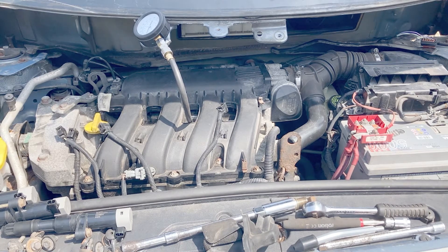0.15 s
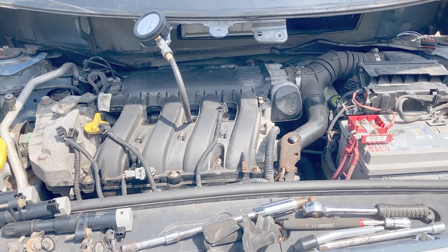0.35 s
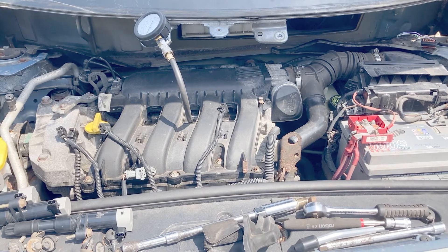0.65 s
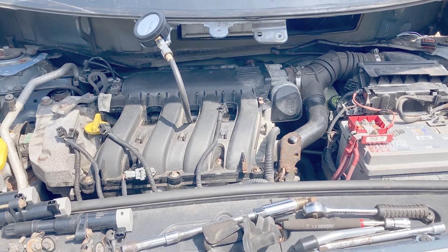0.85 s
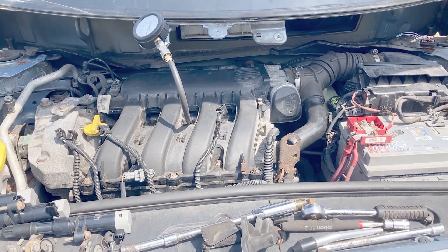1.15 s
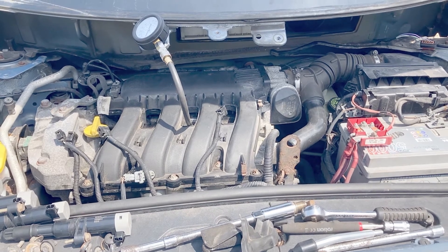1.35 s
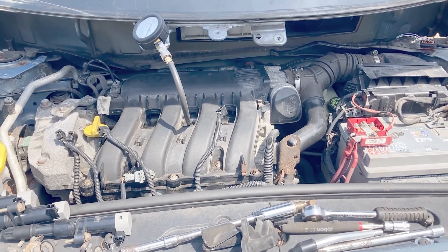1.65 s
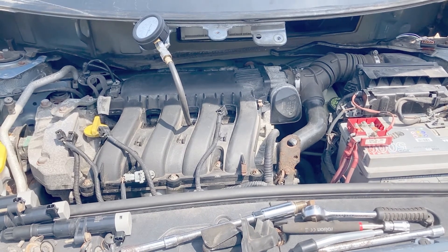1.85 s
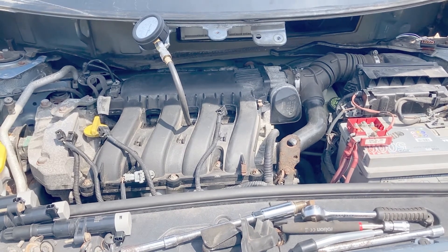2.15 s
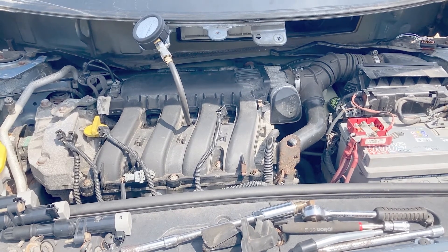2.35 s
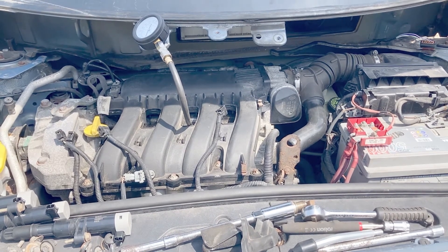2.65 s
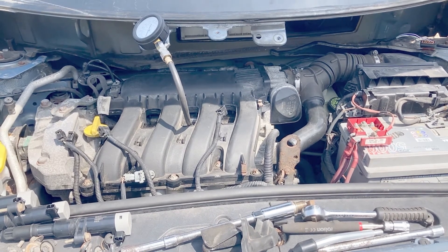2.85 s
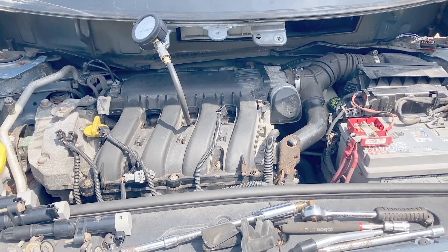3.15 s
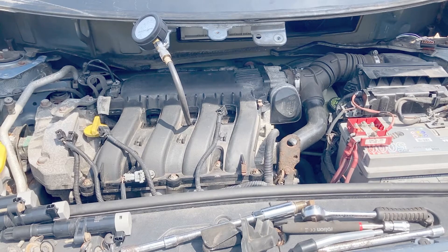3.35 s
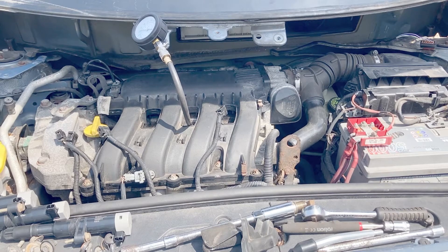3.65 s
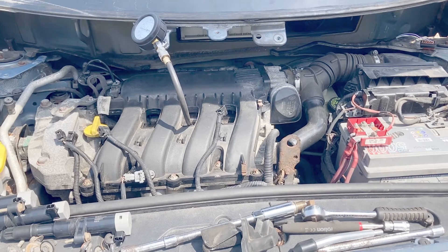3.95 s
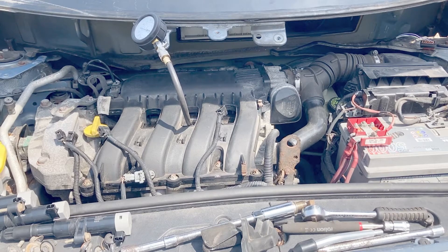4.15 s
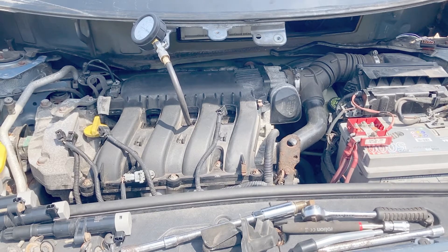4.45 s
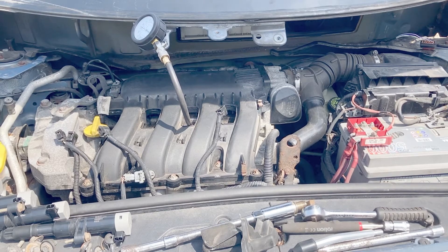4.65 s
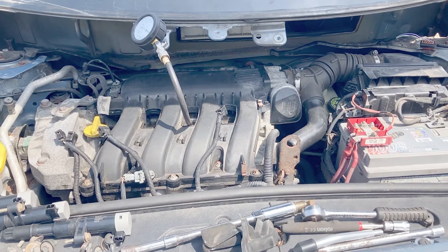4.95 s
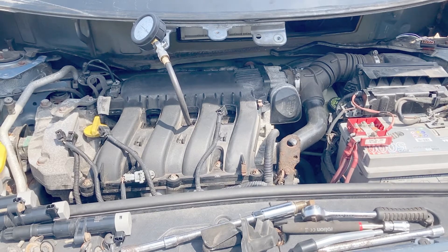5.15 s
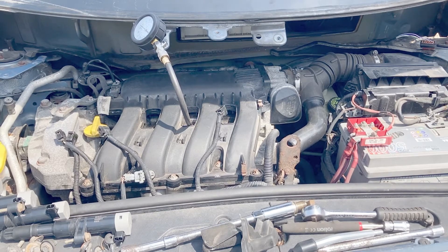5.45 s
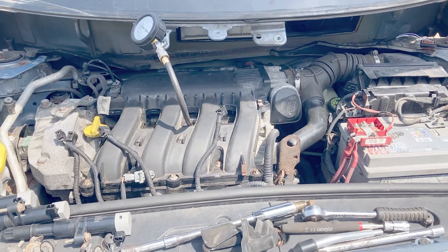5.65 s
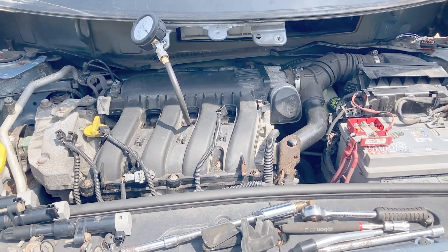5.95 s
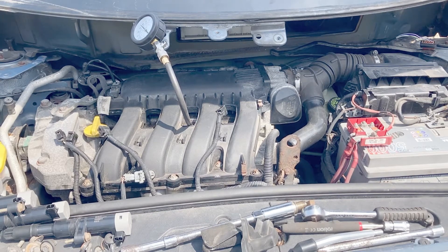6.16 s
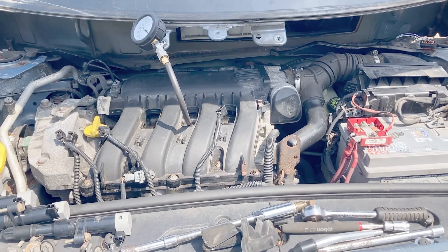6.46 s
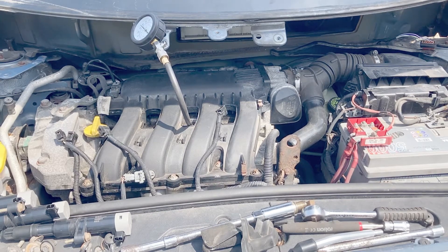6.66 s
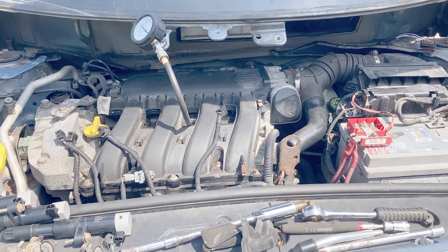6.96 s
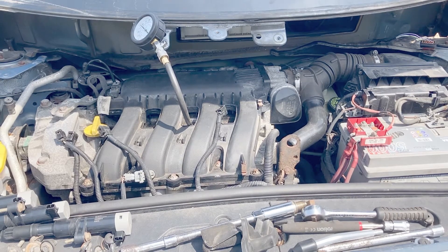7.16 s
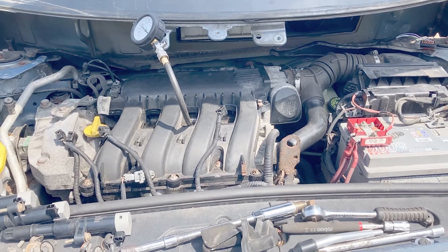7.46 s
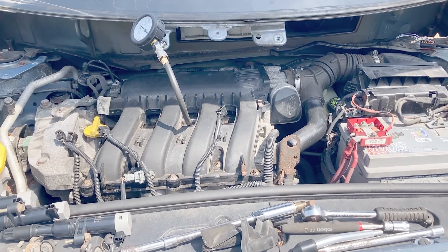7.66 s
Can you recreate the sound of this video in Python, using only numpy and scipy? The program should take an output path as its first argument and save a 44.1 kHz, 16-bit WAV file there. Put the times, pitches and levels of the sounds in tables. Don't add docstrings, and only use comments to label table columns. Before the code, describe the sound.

Outdoors, close over an open engine bay, stereo phone microphones. From 0 to 1.6 s it is quiet: low wind buffets, distant traffic, slight rustling, very faint bird warbles, a dull click near 0.75 and tiny ones at 1.43. At 1.58 to 1.68 clicks tumble into a loud metallic slam. The starter moans and grinds through a slow heave, then a second from 2.0 that drops in pitch. At 2.48 one hard, hollow knock; the level ducks briefly and recovers. Until 6.3 the engine cranks without catching: a gritty toothed growl on each compression, sagging slightly, followed by looser rattle, roughly every 0.17 s, with uneven clanks and ringing. At 6.3 it releases with a thud, rocking back with small knocks. A bright brush hiss and soft whirr fade until about 7.5, with a faint falling squeak near 7.1. Light clicks come at 6.8, 7.3, 7.7 and 7.8 over wind.

```python
import sys
import numpy as np
from scipy import signal
from scipy.fft import rfft, irfft, next_fast_len
from scipy.io import wavfile
from scipy.ndimage import uniform_filter1d

SR = 44100
rng = np.random.default_rng(int(sys.argv[2]) if len(sys.argv) > 2 else 0)


def amplitude_ratio(level_db):
    exponent = np.asarray(level_db, float) / 20
    return 10 ** exponent


def file_out(sig):
    cols = np.atleast_2d(sig).T
    lim = np.clip(cols, -1, 1)
    pcm = np.round(lim * 32767).astype(np.int16)
    wavfile.write(sys.argv[1], SR, pcm)


N = 343980
T = np.arange(N) / SR
F = np.fft.rfftfreq(4096, 1 / SR)
BURST = 6000


def curve(rows, off_db=None):
    s, *columns = np.transpose(rows)
    return [np.interp(T, s, c, off_db, off_db) for c in columns]


def colour(x, slope, modes=()):
    hz, db = np.transpose(slope)
    power = amplitude_ratio(np.interp(np.log(F + 1), np.log(hz), db)) ** 2
    power = power * (1 + sum(amplitude_ratio(g) ** 2 / (1 + (2 * (F - f) / w) ** 2) for f, w, g in modes))
    cepstrum = irfft(np.log(power / power.mean()) / 2)
    cepstrum[1:2048] *= 2
    cepstrum[2049:] = 0
    response = irfft(np.exp(rfft(cepstrum)))[:2048]
    return signal.fftconvolve(x, response)[:len(x)]


def walk(rate):
    k = int(SR / rate)
    held = np.repeat(rng.standard_normal(N // 20), k)[:N]
    return uniform_filter1d(uniform_filter1d(held, k), k)


def noise():
    return rng.standard_normal(N)


def tone(hz):
    return np.sin(2 * np.pi * np.cumsum(hz) / SR)


def add(out, s, sound):
    i = int(s * SR)
    out[i:i + len(sound)] += sound[:len(out) - i]


def ring(hz, t60):
    t = np.arange(BURST) / SR
    return np.sin(2 * np.pi * hz * t) * amplitude_ratio(-60 * t / t60)


def swell(samples):
    return np.minimum(np.arange(BURST) / samples, 1)


def castings(count):
    place, strength = rng.random((count, 2)).T
    centres_hz = 1500 + 12000 * place ** 1.5
    return [(hz, 30 + hz / 220, db) for hz, db in zip(centres_hz, 5 + 9 * strength)]


# (time [s], grind peak [dB], take-up clank [dB])
STROKES = [(1.9858, -19.5, -18), (2.2434, -19, -22), (2.425, -18.5, -22), (2.576, -19, -15),
           (2.7717, -15.5, 0), (2.9514, -17.5, -0.5), (3.1242, -17.5, -26), (3.276, -19, -3),
           (3.46, -17.5, -6.5), (3.637, -18.5, -1), (3.8126, -18, -6.5), (3.9625, -19, -3),
           (4.1443, -18, -3.5), (4.323, -18.5, -0.5), (4.4955, -17.5, -3), (4.6471, -19.5, -16),
           (4.8309, -19, -1.5), (5.0065, -18.5, -4.5), (5.1757, -17.5, -2), (5.327, -19.5, -6.5),
           (5.509, -17, -4), (5.6872, -19, -1.5), (5.857, -17.5, -1.5), (6.0061, -19.5, -10),
           (6.1869, -17, -6)]
# (tooth [dB], overrun below load [dB], loaded time [s], backlash thud [dB])
CYLINDERS = [(2.5, -6, 0.091, -26), (1, -6, 0.087, -35), (-7.5, -6.5, 0.075, -30.5),
             (-1.5, -5.5, 0.106, -45)]
# (time [s], tooth rate [Hz], grind [dB], motor moan [dB])
SPIN_UP = [(1.66, 125.1, -27, -51), (1.73, 148.6, -37, -26), (1.775, 192.7, -29.5, -35),
           (1.84, 201, -29, -27.5), (1.91, 191.7, -29.5, -26.5), (1.93, 191.7, -33, -37.5),
           (1.98, 184, -36, -40)]
# (time [s], tooth rate [Hz], motor moan [dB])
SECOND_HEAVE = [(1.995, 329.3, -40), (2.045, 329.3, -29), (2.09, 278.4, -27.5), (2.14, 227, -25),
                (2.165, 242.7, -38), (2.215, 246.2, -32), (2.235, 242.2, -70)]
LONG_STROKE_S = 0.151
TAKE_UP_HZ, SLOWING_HZ_PER_S = 386.5, 600
KNOCK_S, KEY_OFF_S = 2.476, 6.295
KICK_BACK_DB = 7


def crank():
    first_hz, grind_db, _ = curve(SPIN_UP)
    hz = np.where(T < STROKES[0][0], first_hz, curve(SECOND_HEAVE)[0])
    grind = (T > SPIN_UP[0][0]) * amplitude_ratio(grind_db)
    tooth, clank, rattle = np.zeros((3, N))
    ends = [row[0] for row in STROKES[1:]] + [KEY_OFF_S + 0.092]
    for k, (s, peak_db, clank_db) in enumerate(STROKES):
        tooth_db, overrun_db, loaded_s, _ = CYLINDERS[k % len(CYLINDERS)]
        if k == 0:
            loaded_s = LONG_STROKE_S
        if s < KNOCK_S < ends[k]:
            loaded_s = KNOCK_S + 0.0078 - s
        if k == len(STROKES) - 1:
            overrun_db += KICK_BACK_DB
        span = slice(int(s * SR), int(ends[k] * SR))
        t = T[span] - s
        load = 1 / (1 + np.exp((t - loaded_s) / 0.0051))
        if k > 0:
            start_hz = TAKE_UP_HZ * (1 + .025 * rng.standard_normal())
            hz[span] = start_hz - SLOWING_HZ_PER_S * np.minimum(t, loaded_s)
        snap = .75 - .5 * (0 < s - KNOCK_S < .15)
        bite = snap * np.minimum(t / .0025, 1) + (1 - snap) * np.minimum(t / .03, 1)
        bite_db = -10.5 - 9 * (t / loaded_s - .64) ** 2 / 0.24
        letting_go = 1 + np.exp((t - loaded_s + 0.0034) / 0.0018)
        tooth[span] = amplitude_ratio(peak_db + tooth_db + bite_db) * load / letting_go
        grind[span] = amplitude_ratio(peak_db - 4.5 - 6.5 * t) * load * bite
        clank[span] = amplitude_ratio(peak_db + clank_db) * np.minimum(t / 0.003, 1) * np.exp(-t / 0.018)
        parting = np.clip((ends[k] - s - t) / 0.013, .6, 1)
        racing_db = -1.5 - 60 * np.abs(t - loaded_s - .018)
        rattle[span] = amplitude_ratio(peak_db + overrun_db + racing_db) * (1 - load) * parting
    on = 1 / (1 + np.exp(np.clip((T - KEY_OFF_S) / .014, -30, 30)))
    return hz, tooth * on, grind * on, clank * on, rattle * on


# (frequency [Hz], width [Hz], level over the slope [dB])
BODY = [(360.4, 36.5, 16.5), (474, 63, 15.5), (583, 25, 16), (914, 55, 17.5), (1003, 45, 17.5),
        (1108, 41, 18.5), (1316, 67, 16.5), (1500, 14, 16), (2245, 27, 14), (2365, 36, 11.5),
        (2624, 25, 15), (3420, 38, 15), (3650, 13, 6.5), (5500, 100, 12.5), (6800, 130, 11),
        (7430, 180, 7.5)]
# (frequency [Hz], density [dB per Hz])
TOOTH = [(60, -34.5), (200, -15), (340, -9.5), (500, -3.5), (680, -0.5), (1000, -14.5), (1400, -6.5),
         (2500, -22), (16000, -85)]
GRIND = [(60, -9), (150, -0.5), (400, -2), (1000, -4), (2000, -6.5), (3500, -9.5), (4900, -11.5),
         (5600, -10.5), (7000, -11.5), (7900, -6.5), (9150, -4), (10200, -9), (11000, -15), (15500, -11),
         (20000, -38.5)]
CLANK = [(100, -31.5), (300, 6), (480, -8.5), (650, -5.5), (900, -3.5), (1500, -27), (3000, -17),
         (7000, -12.5), (16000, -11)]
RATTLE = [(60, -2.5), (150, 3.5), (330, -4.5), (500, -3.5), (1000, -7), (2000, -8.5), (3500, -10),
          (4900, -11.5), (5600, -6), (7000, -9.5), (7900, -4), (9150, -4), (10200, -5), (11000, -12.5),
          (15500, -3.5), (20000, -43)]
# (frequency [Hz], level [dB])
MOAN = [(130, -18), (200, -3), (235, -17), (320, -6), (400, 0), (560, -3.5), (650, -7), (800, -27.5),
        (1000, -5), (1350, -7), (2000, -27)]
OVERTONE_DB = -1.5
OVERRUN_HZ, OVERRUN_DB = 490, -12


def starter():
    hz, tooth, grind, clank, rattle = crank()
    phase = np.cumsum(hz * (1 + 0.02017 * walk(100)) / SR)
    hits = np.flatnonzero(np.diff(np.floor(phase)))
    early = (0.025 * noise()[:len(hits)] * SR / hz[hits]).astype(int)
    strength = amplitude_ratio(3.45 * noise()[:len(hits)]) * np.sqrt(SR / hz[hits])
    pulses = np.zeros(N)
    pulses[np.clip(hits - early, 0, N - 1)] = strength
    gate = 0.64 + 0.55 * np.exp(-(phase % 1) / 1.07)
    scrape = noise() * gate * amplitude_ratio(2.86 * walk(75) + 1.1 * walk(350))
    chatter = noise() * amplitude_ratio(0.94 * walk(220))
    steady_grind = noise() * grind * amplitude_ratio(-4.5 + 2.0 * walk(9))
    layers = [(pulses * tooth, TOOTH), (scrape * grind, GRIND), (noise() * clank, CLANK),
              (chatter * rattle, RATTLE), (steady_grind, GRIND)]
    out = sum(colour(x, slope, BODY + castings(count=80)) for x, slope in layers)
    whine = tone(OVERRUN_HZ * (1 + 0.01927 * walk(30)))
    out += rattle * amplitude_ratio(OVERRUN_DB + 8.9 * walk(40)) * whine
    moan = amplitude_ratio(curve(SPIN_UP, -120)[-1]) + amplitude_ratio(curve(SECOND_HEAVE, -120)[-1])
    case_hz, case_level_db = np.transpose(MOAN)
    turns = np.cumsum(hz) / SR
    for k in range(1, 8):
        case_db = np.interp(np.log(k * hz), np.log(case_hz), case_level_db)
        level = amplitude_ratio(case_db + k * OVERTONE_DB + 1.7 * walk(50))
        out += np.sqrt(2) * moan * level * np.sin(2 * np.pi * k * (turns + 0.094 * walk(60)))
    return out


# (time [s], peak [dB], frequency [Hz], half length [s]) # tooth rate sliding through the block
GROWLS = [(2.296, -34, 336, 0.019), (2.473, -24.5, 355, 0.02), (2.655, -24, 334, 0.032),
          (2.823, -21.5, 347, 0.038), (3.011, -22.5, 345, 0.014), (3.179, -20, 353, 0.022),
          (3.344, -22.5, 347, 0.02), (3.522, -18.5, 361, 0.024), (3.715, -26, 345.7, 0.011),
          (3.863, -20.5, 359.5, 0.02), (4.033, -22, 343.7, 0.012), (4.2, -19.5, 353, 0.027),
          (4.365, -30, 353, 0.03), (4.551, -21, 358.3, 0.029), (4.718, -25, 345, 0.021),
          (4.895, -17.5, 350, 0.013), (5.065, -24.5, 346, 0.011), (5.237, -17.5, 363, 0.011),
          (5.406, -23, 335, 0.02), (5.566, -18.5, 352, 0.027), (5.73, -25, 352, 0.016),
          (5.905, -22, 361.8, 0.029), (6.081, -22.5, 339, 0.012), (6.254, -18.5, 347, 0.014)]
SURGES = [(2.315, -20, 947, 0.013), (2.438, -15, 950, 0.0043), (2.659, -21.5, 959, 0.017),
          (2.839, -18, 960, 0.0056), (3.004, -21.5, 1017, 0.016), (3.162, -31.5, 1106, 0.027),
          (3.348, -17, 988, 0.0063), (3.526, -23, 960, 0.0075), (3.701, -19.5, 980, 0.0073),
          (3.866, -39, 1050, 0.0041), (4.013, -21, 1083, 0.016), (4.204, -26.5, 1030, 0.03),
          (4.342, -19, 962, 0.0093), (4.527, -28.5, 965, 0.031), (4.703, -29, 1077, 0.0058),
          (4.891, -28, 975, 0.018), (5.072, -34, 1000, 0.006), (5.228, -37.5, 1044, 0.016),
          (5.386, -29, 997, 0.025), (5.523, -30, 960, 0.01), (5.749, -22, 988, 0.0077),
          (5.909, -36, 1048, 0.0049), (6.083, -19, 1022, 0.0087), (6.258, -23, 991, 0.0075)]
HEAVE_SURGES = [(1.668, -23, 575, 0.018), (2.3, -23, 915, 0.01302), (2.068, -20.5, 840, 0.018),
                (2.02, -30, 820, 0.02), (2.11, -28.5, 820, 0.013), (2.03, -31, 325, 0.036),
                (6.446, -35.5, 1300, .005), (6.495, -39, 1310, 0.0033), (6.534, -37, 1240, 0.0043),
                (6.603, -34, 1010, .005), (6.373, -29, 990, 0.0067)]
HUMS = [(2.276, -20, 441.4, 0.0088), (2.453, -28.5, 458, 0.013), (2.597, -55, 484, 0.009),
        (2.786, -22, 488, 0.0095), (2.975, -34.5, 444, 0.024), (3.171, -31, 469.3, 0.01),
        (3.332, -32, 467.6, 0.011), (3.492, -27, 465.6, 0.025), (3.694, -31, 438, 0.018),
        (3.837, -21, 480, 0.01), (3.994, -30.5, 478, 0.06), (4.165, -24, 460.7, 0.014),
        (4.446, -25.5, 490, 0.0091), (4.552, -22.5, 478, 0.013), (4.723, -29, 450, 0.017),
        (4.854, -22.5, 474, 0.012), (5.038, -37, 470, 0.03), (5.216, -31, 476, 0.043),
        (5.341, -21, 460, 0.0081), (5.543, -25.5, 485.5, 0.037), (5.761, -23.5, 465, 0.0086),
        (5.885, -28, 469, 0.016), (6.069, -24, 454, 0.011), (6.221, -20, 483, 0.025)]


def growls():
    out = np.zeros(N)
    # (swells, trim [dB], sag [Hz per s])
    groups = ((GROWLS, -1.5, 300), (SURGES + HEAVE_SURGES, -4.0, 100), (HUMS, -3.0, 50))
    for rows, trim_db, sag_hz_per_s in groups:
        for s, db, hz, half_s in rows:
            t = np.arange(-3 * half_s, 3 * half_s, 1 / SR)
            rough = walk(160)[:len(t)]
            voice = np.sin(2 * np.pi * ((hz - sag_hz_per_s * t / 2) * t + 0.031 * rough))
            level = amplitude_ratio(db + trim_db + 2.8 * walk(112.7)[:len(t)])
            add(out, s + t[0], level * .5 ** ((t / half_s) ** 2) * voice)
    return out


def releases():
    out = np.zeros(N)
    for k, (s, peak_db, clank_db) in enumerate(STROKES[1:], 1):
        loaded_s, scatter = CYLINDERS[k % len(CYLINDERS)][2], rng.standard_normal()
        add(out, s + 0.00857, amplitude_ratio(peak_db + clank_db - 5.0) * ring(478.5, 0.1) * swell(400))
        gentle_db = -8.3 * (0 < s - KNOCK_S < .15)
        jingle = ring(7300 + 300 * scatter, 0.24) * (0.26 + 2 * walk(1400)[:BURST])
        add(out, s, amplitude_ratio(peak_db - 14.5 + gentle_db) * jingle)
        release_db = peak_db - 12.5 + np.clip(scatter, -1, 1) * np.pi
        add(out, s + loaded_s - .018, amplitude_ratio(release_db) * ring(672.1, 0.16) * swell(400))
    return out


# (time [s], peak [dB])
THUDS = [
    (1.657, -29.5),
    (2.212, -37),
    (6.267, -21.5),
    (6.304, -24),
    (6.377, -30),
    (6.42, -37),
]
# (frequency [Hz], level [dB], t60 [s])
KNOCK = [(688, -5.5, 0.081), (1900, -30, 0.17), (900, -5, 0.025), (1250, -19.5, 0.044), (1644, -5.5, 0.017),
         (2020, -10.5, 0.02), (3000, -15.5, 0.017)]
KNOCK_DB = -3.5
THUD_LAG_S = 0.0085


def thuds():
    out = np.zeros(N)
    take_ups = [(row[0] + THUD_LAG_S, CYLINDERS[k % len(CYLINDERS)][-1]) for k, row in enumerate(STROKES)]
    for s, peak_db in THUDS + take_ups:
        add(out, s, amplitude_ratio(peak_db + 4.0) * ring(139.6, 0.11) * swell(350))
    knock = sum(amplitude_ratio(db) * ring(hz, t60) for hz, db, t60 in KNOCK)
    add(out, KNOCK_S, amplitude_ratio(KNOCK_DB) * knock * swell(60))
    return out


# (time [s], peak [dB], treble tilt [about dB per octave, -4 is
# flat], t60 [s], ring [Hz])
CLICKS = [(0.733, -41.5, -11, 0.18, 1300), (0.762, -35, -14.5, 0.15, 750), (1.434, -42, 2, 0.039, 10300),
          (1.44, -49, 3, 0.033, 4000), (1.577, -37, -5, 0.038, 11500), (1.579, -25.5, -5.5, 0.056, 980),
          (1.594, -43, 6, 0.019, 11700), (1.602, -25, -6, 0.023, 7840), (1.604, -25, -8, 0.046, 960),
          (1.616, -42, -7, 0.1, 990), (1.635, -44, -5, .05, 11500), (1.644, -30, -8, 0.13, 6930),
          (1.647, -19.5, 3.5, 0.046, 7500), (1.654, -9, -3, 0.056, 583), (1.671, -10.5, -7, 0.018, 506),
          (1.675, -20, -9, 0.1, 458), (2.438, -16, -1.5, 0.02, 946), (2.472, -9.5, -6, 0.026, 2720),
          (2.476, -10, -7, 0.031, 1900), (6.302, -17.5, -3.5, 0.044, 7700), (6.369, -28.5, -11, 0.087, 940),
          (6.399, -34, -13, .05, 1053), (6.581, -34, -9, 0.045, 830), (6.444, -32, -6.5, 0.044, 1210),
          (6.793, -32, -10, 0.059, 1600), (6.811, -37, -11, 0.057, 990), (6.871, -31.5, -6.5, 0.063, 1500),
          (6.875, -44, -19, 0.062, 2900), (7.522, -60, -4.5, 0.072, 6800),
          (7.321, -41.5, -8.5, 0.047, 6700), (7.701, -43.5, -11.5, 0.074, 2300), (7.704, -64, 5, .06, 6800),
          (7.793, -30, -7, 0.079, 2970)]


def clicks():
    out, t = np.zeros(N), np.arange(BURST) / SR
    for s, peak_db, tilt_db, t60, ring_hz in CLICKS:
        burst = rng.standard_normal(BURST) * amplitude_ratio(-60 * t / t60) * np.minimum(t / (0.057 * t60), 1)
        slope = [(60, -35.0), (250, -21.5), (12500, 6 * tilt_db), (16500, 6 * tilt_db - 8)]
        add(out, s, amplitude_ratio(peak_db) * colour(burst, slope, [(ring_hz, 130, 11), (2100, 2200, 5)]))
    return out


# (time [s], frequency [Hz], level [dB])
SQUEAK = [(6.97, 3700, -72), (7.0, 3680, -62), (7.05, 3560, -62), (7.1, 3230, -62), (7.15, 2920, -64),
          (7.22, 2650, -69)]
FREED_S, AT_REST_S = 6.325, 7.565
HISS_DB, HISS_POWER = -42.5, 1.14
WHIRR_DB, WHIRR_DB_PER_S = -42.5, -10
SHUDDER_DB, SHUDDER_S = 7.5, 0.04


def coasting():
    since = np.maximum(T - FREED_S, 0)
    free = (T > FREED_S) * amplitude_ratio(SHUDDER_DB * np.exp(-since / SHUDDER_S))
    speed = np.clip(1 - since / (AT_REST_S - FREED_S), 0, 1)
    hiss_slope = [(300, -28), (1200, -11.0), (3200, -5.0), (4300, -4.5), (5200, -2.5), (7200, -2.5),
                  (9000, 0), (11000, -10.0), (16000, -6.0)]
    hiss = colour(noise(), hiss_slope, castings(count=160))
    hiss *= speed ** HISS_POWER * amplitude_ratio(HISS_DB + 4.0 + 2.7 * walk(60))
    whirr_slope = [(100, 1), (300, 3.0), (1000, -5.5), (1800, -7.0), (3600, -20.0), (6000, -60)]
    whirr = colour(noise(), whirr_slope, BODY)
    whirr *= amplitude_ratio(WHIRR_DB + WHIRR_DB_PER_S * since + 2.9 * walk(25) + 1.7 * walk(120))
    squeak_hz, squeak_db = curve(SQUEAK)
    squeaking = (T > SQUEAK[0][0]) * (T < SQUEAK[-1][0])
    squeak = squeaking * amplitude_ratio(squeak_db + 5.8 * walk(70)) * tone(squeak_hz * (1 + 0.03 * walk(300)))
    return squeak + free * (hiss + whirr)


# (time [s], peak [dB], half length [s])
GUSTS = [(0.006, -42, 0.03), (0.218, -59, 0.045), (0.408, -49, 0.1), (0.64, -47, 0.1), (0.79, -38, 0.033),
         (0.892, -39.5, 0.031), (1.5, -48, 0.088), (1.69, -47, 0.055), (2.253, -46, 0.11),
         (2.477, -44, 0.022), (2.661, -40, 0.11), (2.736, -22.5, 0.033), (3.158, -40, 0.057),
         (3.78, -51, 0.086), (4.72, -61, 0.11), (4.967, -47, 0.045), (5.398, -50, 0.063),
         (5.634, -50, 0.065), (6.213, -42, 0.15), (6.647, -39, 0.059), (6.792, -34.5, 0.13),
         (7.037, -40, .05), (7.137, -41.5, 0.045), (7.33, -49, 0.077), (7.573, -43, 0.13),
         (7.766, -36.5, 0.086)]
# (time [s], peak [dB], rise [s], fading [dB per s])
RUSTLE = [(0.0, -63, .002, 900), (0.156, -64, .03, 500), (0.418, -66, .03, 130), (0.51, -67, .02, 700),
          (0.79, -52, 0.058, 106), (0.85, -73, 0.066, 46.5), (1.438, -53, .005, 592),
          (1.46, -68.5, .03, 27), (1.0, -85, .04, 41)]
# (frequency [Hz], density [dB per Hz])
WIND_COLOUR = [(10, -20.5), (25, -30), (45, 0), (70, 3), (100, -3.5), (150, -15.5), (300, -66.5)]
TRAFFIC = [(59, -17.5), (100, -5), (170, -4), (215, -3), (318, -12.5), (393, -16.5), (445, -10),
           (495, -16.5), (732, -20), (829, -15), (1440, -32), (3560, -48), (4990, -45.5), (7000, -70),
           (9100, -99.5), (15400, -120)]
BREEZE_DB, TRAFFIC_DB, PORT_HISS_DB = -50.5, -49.5, -87.5


def outdoors():
    wind = amplitude_ratio(BREEZE_DB + 3.5 * walk(14))
    wind += sum(amplitude_ratio(db) * np.exp(-2 * ((T - s) / half_s) ** 2) for s, db, half_s in GUSTS)
    stir = np.zeros(N)
    for s, db, rise_s, fade in RUSTLE:
        rise = np.clip(1 + (T - s) / rise_s, 0, 1) ** 2
        stir += amplitude_ratio(db - fade * np.maximum(T - s, 0)) * rise
    far = sum(colour(noise() * amplitude_ratio(2.2 * walk(rate)), TRAFFIC) for rate in (5, 11)) / np.sqrt(2)
    rustle_slope = [(800, -1), (1800, -6.5), (4500, -16.5), (7000, -24.5), (11000, -28), (16000, -40)]
    rustle = colour(noise() * amplitude_ratio(1.4 * walk(41.7)), rustle_slope)
    hiss = colour(noise(), [(3000, -11.0), (6000, -1), (12000, 0.5), (16000, -30)])
    rumble = colour(noise(), WIND_COLOUR) * wind
    return rumble + far * amplitude_ratio(TRAFFIC_DB) + hiss * amplitude_ratio(PORT_HISS_DB) + rustle * stir


# (time [s], length [s], frequency [Hz], level [dB])
BIRDS = [(0, 0.17, 4880, -71), (0.38, 0.16, 3200, -73), (0.398, 0.056, 4700, -72), (.55, 0.067, 4270, -71),
         (.88, .08, 5600, -79), (.99, 0.14, 3300, -75), (1.094, 0.087, 4730, -77), (1.337, 0.26, 4900, -75),
         (.1, 0.11, 3630, -75), (.3, 0.22, 4220, -80), (0.617, .1, 4600, -80), (0.848, .12, 4700, -80),
         (0.996, .06, 5400, -82), (1.24, 0.11, 3000, -82), (1.456, .11, 5450, -75)]


def birds():
    out = np.zeros(N)
    for s, length_s, hz, db in BIRDS:
        size = int(length_s * SR)
        blur = np.hanning(size) ** .5 * 1.6 * walk(520)[:size]
        add(out, s, amplitude_ratio(db) * blur * tone(hz * (1 + 0.05 * walk(35)[:size])))
    return out


# (frequency
# [Hz], right leads by [rad], likeness [0-1], left minus right [dB])
PORTS = [(0, 0, .82, 0), (80, 0, .8, 0), (140, 0, .96, 0), (350, -.15, .975, .6), (600, -.5, .74, 1.8),
         (780, -.1, .6, 1), (950, -.45, .84, 1.8), (1250, -.2, .8, 1.6), (1600, -.2, .35, 3),
         (2300, -1.3, .4, 2.3), (2900, -2.0, .25, 2.3), (3400, 0, .1, 2.3), (4150, .5, .66, 1),
         (4650, .5, .15, 1), (5230, np.pi, .75, .5), (5600, 3.4, .2, 0), (5900, 0, .1, 0),
         (6200, 0, .45, 0), (6700, 0, .93, 0), (7000, .1, .93, 0),
         (7700, 1.2, .75, 0), (8400, 2.4, .85, 0), (8850, np.pi, .995, 0), (9500, np.pi, .995, 0),
              (10300, 4.9, .7, 0), (11100, 2 * np.pi, .97, 0), (11700, 2 * np.pi, .98, 0),
              (12400, 7.8, .65, 0), (12900, 9.1, .8, 0), (13150, 3 * np.pi, .995, 0),
              (14100, 3 * np.pi, .99, 0), (14450, 10.1, .62, 0), (14800, 11.3, .65, 0),
              (15500, 4 * np.pi, .98, 0)]
TOP_HZ = 15780


def ports(direct, scattered):
    size = next_fast_len(N + 2048)
    hz, *columns = np.transpose(PORTS)
    f = np.fft.rfftfreq(size, 1 / SR)
    lead, like, pan_db = (np.interp(f, hz, c) for c in columns)
    like = np.clip(like, 0, 1)
    top = np.cos(np.pi / 2 * np.clip((f - TOP_HZ) / 400 + .5, 0, 1)) ** 2
    left = rfft(direct, size) * top
    stray = rfft(scattered, size) * top
    right = like * np.exp(1j * lead) * left + np.sqrt(1 - like ** 2) * stray
    return irfft(np.array([left * amplitude_ratio(pan_db / 2), right * amplitude_ratio(-pan_db / 2)]), size)[:, :N]


def scene():
    knocks = thuds() + releases() + growls()
    direct, scattered = (starter() + knocks + coasting() + clicks() + outdoors() + birds()
                         for _ in range(2))
    slam = np.exp(-((T - 1.665) / .015) ** 2)
    return ports(direct, scattered) + amplitude_ratio(-15) * slam * np.diff(clicks(), prepend=0)


def top_cut(x):
    return signal.sosfilt(signal.butter(12, 16100, fs=SR, output="sos"), x)


def record(dry):
    since = np.maximum(T - KNOCK_S - .018, 0)
    duck_db = -9 * np.minimum(since / 0.0057, 1) * np.exp(-since / 0.24)
    rounded = 1.5 * np.tanh(dry * amplitude_ratio(duck_db) / 1.5)
    return top_cut(rounded)


dry = scene()
out = record(dry)
file_out(out)
```